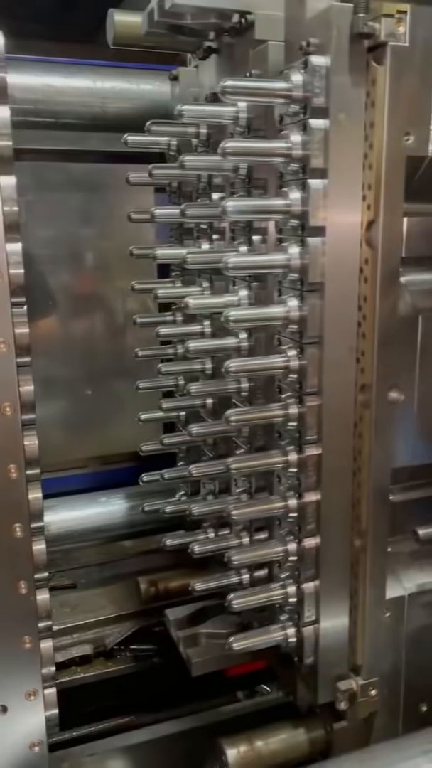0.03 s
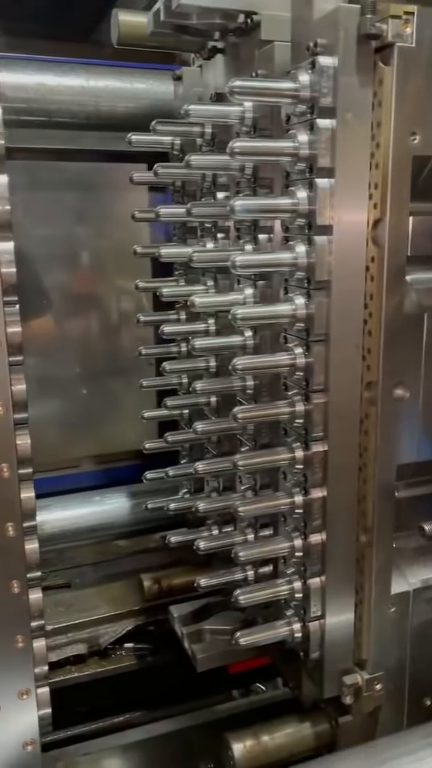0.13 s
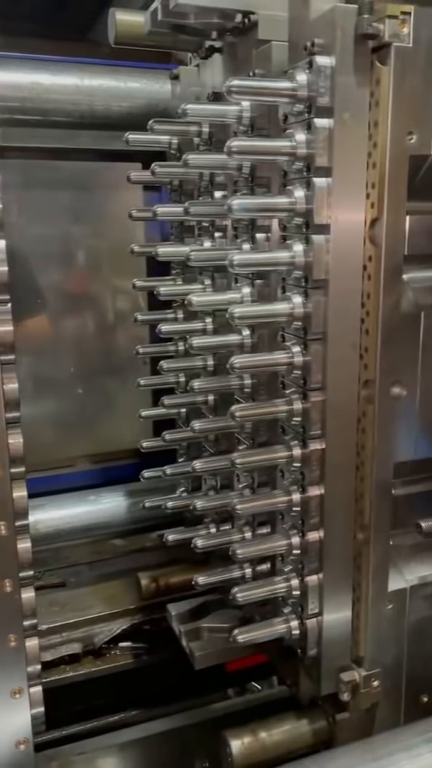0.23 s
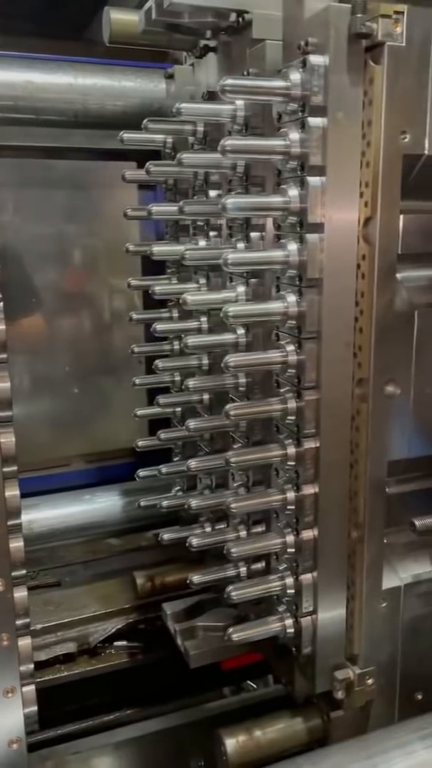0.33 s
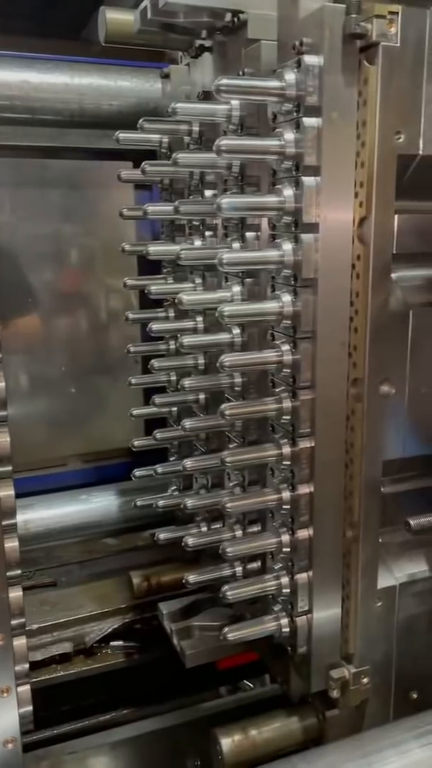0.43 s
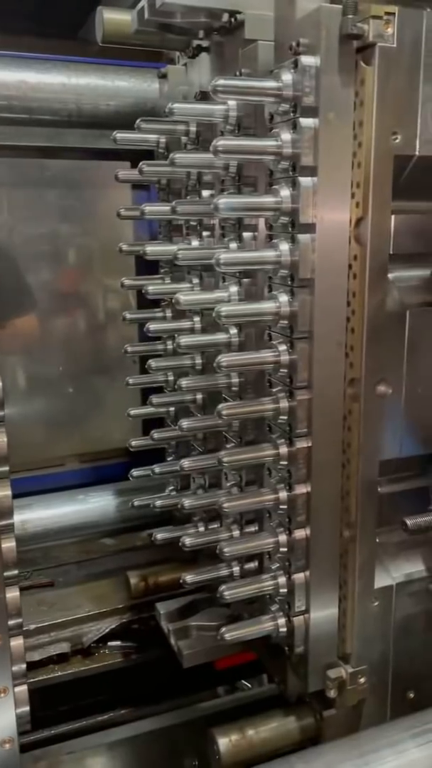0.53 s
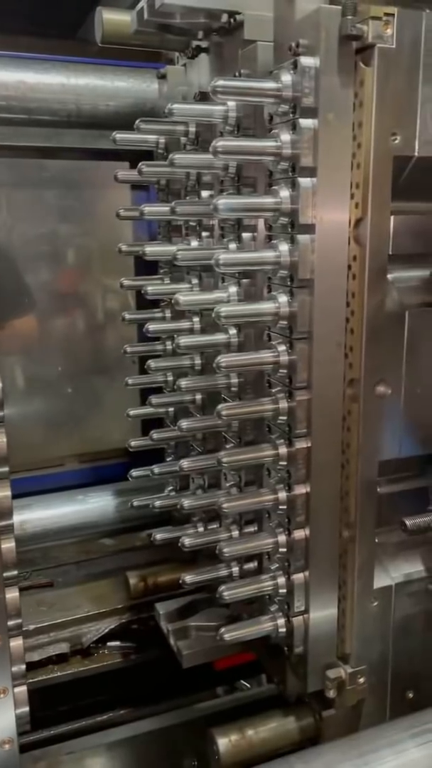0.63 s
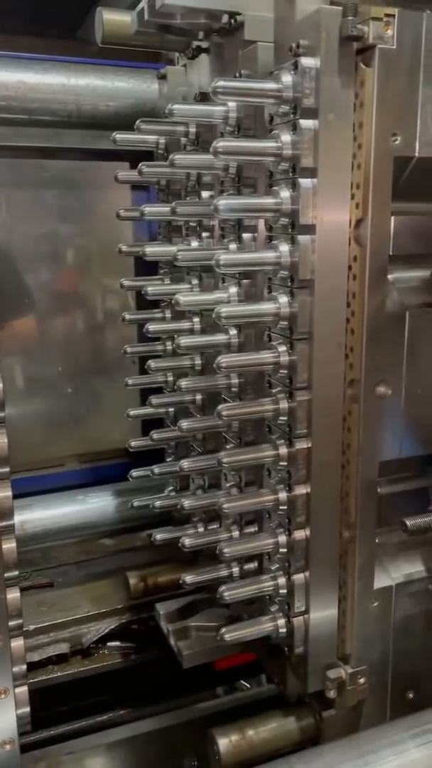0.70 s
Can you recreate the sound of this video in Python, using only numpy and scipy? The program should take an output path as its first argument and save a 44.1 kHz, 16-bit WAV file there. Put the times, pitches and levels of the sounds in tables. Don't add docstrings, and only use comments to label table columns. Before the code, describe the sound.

An injection moulding machine about a metre away rumbles and hums with scraping slides and thin hiss. At 0.7 s a knock, short air spurt and squeaks come; from 1.2 to 1.7 s metal plates clatter densely. The drive sinks, a sharp clack lands at 2.25 s, and at 2.5 s air bursts out, hissing and gradually dulling to 4 s, with a faint tick near 3.9. Short factory reverberation, thinned phone treble.

```python
import sys
import numpy as np
from scipy import signal
from scipy.fft import rfft, irfft
from scipy.io import wavfile
from scipy.ndimage import uniform_filter1d

SR = 44100
rng = np.random.default_rng(int(sys.argv[2]) if len(sys.argv) > 2 else 0)


def log_audio(samples):
    frames = np.atleast_2d(samples).T
    limited = np.clip(frames, -1, 1)
    pcm = np.round(limited * 32767).astype(np.int16)
    wavfile.write(sys.argv[1], SR, pcm)


def rack_gain(trim_db):
    fader = np.asarray(trim_db, float)
    return 10 ** (fader / 20)


N = 176400
T = np.arange(N) / SR
HZ = np.maximum(np.arange(N // 2 + 1) * SR / N, 1)


def over_hz(table):
    hz, value = np.array(table).T
    return np.interp(np.log(HZ), np.log(hz), value)


def over_time(table):
    seconds, db = np.array(table).T
    return rack_gain(np.interp(T, seconds, db))


def unit(x):
    return x / np.sqrt(np.mean(x ** 2))


def walk(rate):
    hold = int(SR / rate)
    steps = np.repeat(rng.standard_normal(N // hold + 1), hold)
    smooth = uniform_filter1d(uniform_filter1d(steps, hold), hold)
    return unit(smooth[:N])


def causal(x, db):
    cepstrum = irfft(np.log(rack_gain(db)), N)
    cepstrum[1:N // 2] *= 2
    cepstrum[N // 2 + 1:] = 0
    return irfft(rfft(x) * np.exp(rfft(cepstrum)), N)


def lively(colour, swell_db, flicker_db, rate):
    spectrum = rfft(rng.standard_normal(N)) * rack_gain(over_hz(colour))
    swell, out = walk(3.25), 0
    for octave in range(5, 15):
        part = np.clip(1 - np.abs(np.log2(HZ) - octave), 0, 1)
        out = out + irfft(spectrum * part, N) * rack_gain(swell_db * swell + flicker_db * walk(rate))
    return unit(out)


def gate(start, length, edge, tail):
    rise = np.clip((T - start) / edge, 0, 1)
    return rise * np.exp(-np.maximum(T - start - length, 0) / tail)


HALL_T60_S, HALL_DB, HALL_TOP_HZ = 0.36, -13, 3020


def hall(hits):
    echoes = rng.standard_normal(N) * rack_gain(-60 * T / HALL_T60_S)
    echoes = echoes / np.sqrt(np.sum(echoes ** 2))
    dull = 1 + 1j * HZ / HALL_TOP_HZ
    return rack_gain(HALL_DB) * irfft(rfft(hits) * rfft(echoes) / dull, N)


# [t/s, level/dB]
DRIVE_LOAD = [(.05, -23), (.6, -26.5), (.85, -27), (1.1, -32.5), (1.3, -28), (1.75, -36), (1.9, -38.5),
              (2.2, -30), (2.3, -37.5), (2.5, -32), (2.65, -42.5), (2.9, -39.5), (3.1, -44.5), (3.7, -43.5),
              (3.9, -43), (4, -44.5)]
# [f/Hz, level/dB]
RUMBLE_COLOUR = [(25, -40), (48, -0.5), (62, -7.5), (130, 1.5), (200, -2.5), (356, -1.5), (470, -28),
                 (1500, -28), (3000, -96)]
# [f/Hz, level/dB]
HUM_TONES = [(48.6, -46), (75.6, -35.5), (157, -38.5), (198.5, -31), (237, -34.5), (406, -42)]
HUM_ENDS_S, HUM_FADE_S, HUM_REST_DB, HUM_WOBBLE_DB = 1.2, .04, -10, 3.5


def drive():
    hum = np.zeros(N)
    for hz, db in HUM_TONES:
        level = rack_gain(db + HUM_WOBBLE_DB * walk(20))
        hum += level * np.sqrt(2) * np.sin(2 * np.pi * hz * T + 1.19 * walk(16))
    load = over_time(DRIVE_LOAD)
    ended = 1 / (1 + np.exp((HUM_ENDS_S - T) / HUM_FADE_S))
    rest = rack_gain(HUM_REST_DB) * load / load[SR]
    rumble = load * lively(RUMBLE_COLOUR, .5, 1.5, 16)
    return rumble + hum * (1 - ended + ended * rest)


# [t/s, level/dB]
SLIDE_LEVEL = [(.05, -34.5), (.6, -32.5), (.85, -37.5), (1.15, -30.5), (1.3, -34.5), (1.41, -31),
               (1.45, -27), (1.7, -28), (1.85, -32), (2.2, -34), (2.28, -44), (2.32, -44.5), (2.48, -36.5),
               (2.55, -40.5), (3, -43), (3.7, -45), (3.85, -43.5), (4, -49)]
# [f/Hz, level/dB]
SCRAPE_COLOUR = [(180, -33), (300, -4), (470, -8.5), (900, -8.5), (3000, -19), (7000, -27), (11800, -30.5)]


def slides():
    return over_time(SLIDE_LEVEL) * rack_gain(5.5) * lively(SCRAPE_COLOUR, .3, 1.5, 18)


# [t/s, level/dB]
LEAK_LEVEL = [
    (.05, -39.5),
    (.63, -37),
    (.7, -40),
    (.725, -12),
    (.76, -36.5),
    (1.0, -37.5),
    (1.3, -40),
    (1.8, -56),
    (2.3, -68),
]
# [f/Hz, level/dB]
HISS_COLOUR = [(2500, -30), (5000, -10), (8000, 0.5), (11800, -6.5)]


def leak():
    return over_time(LEAK_LEVEL) * lively(HISS_COLOUR, 0.91, 1.4, 22.5)


VENT_S, VENT_DB, VENT_ATTACK_S = 2.503, -20.5, 0.0014
PUFF_DB, PUFF_S = 5, .035
DRAIN_DB_PER_S, LATE_DRAIN_DB_PER_S, DARKEN_DB_PER_S = 4.5, 2, 5
VALVE_STEP_S, VALVE_STEP_DB = 2.85, -2.5
# [f/Hz, level/dB]
JET_COLOUR = [(240, -46), (550, -6), (900, 2), (2500, -1), (6700, -2.5), (9000, 3), (11800, -1)]
# [f/Hz, level/dB]
JET_WHISTLES = [(6915, -13.5), (8236, -19)]


def vent():
    t = np.maximum(T - VENT_S, 0)
    db = VENT_DB - DRAIN_DB_PER_S * t
    db += VALVE_STEP_DB * np.clip((T - VALVE_STEP_S) / 0.076, 0, 1)
    db -= LATE_DRAIN_DB_PER_S * np.maximum(T - VALVE_STEP_S, 0)
    jet = lively(JET_COLOUR, .3, 1.2, 30)
    for hz, whistle_db in JET_WHISTLES:
        level = rack_gain(whistle_db + 3.1 * walk(25.06))
        jet = jet + level * np.sin(2 * np.pi * hz * T + 2.7 * walk(60))

    def below(hz):
        return signal.sosfilt(signal.butter(2, hz, fs=SR, output="sos"), jet)

    puff = (rack_gain(PUFF_DB * np.exp(-t / PUFF_S)) - 1) * (jet - 0.7 * below(5300))
    lost_body = (1 - rack_gain(-DARKEN_DB_PER_S * t)) * below(4800)
    return np.clip(t / VENT_ATTACK_S, 0, 1) * rack_gain(db) * (jet + puff - lost_body)


# [t/s, length/s, level/dB, first f/Hz, last f/Hz]
GUIDE_SQUEAKS = [(.745, .04, -27, 1750, 1580), (.785, .045, -27, 1620, 1950), (.845, .075, -36, 5650, 5900),
                 (.82, .14, -35.5, 5380, 5550), (.86, .1, -33.5, 2750, 2780), (.865, .1, -34.5, 1920, 1980),
                 (.94, .025, -31, 1900, 2150), (.95, .012, -33, 5700, 5200), (.865, .05, -33, 1250, 1200),
                 (.79, .06, -34.5, 2900, 2700), (1.12, .2, -34, 930, 975), (3.77, .12, -41, 330, 350)]
SQUEAK_WIDTH_HZ, SQUEAK_EDGE_S, SQUEAK_FLUTTER_DB = 105, .012, 3.5


def squeaks():
    out, jitter, flutter = np.zeros(N), walk(1500), walk(120)
    for start, length, db, first_hz, last_hz in GUIDE_SQUEAKS:
        hz = np.interp(T, [start, start + length], [first_hz, last_hz]) + SQUEAK_WIDTH_HZ * jitter
        level = rack_gain(db + SQUEAK_FLUTTER_DB * flutter) * gate(start, length, SQUEAK_EDGE_S, SQUEAK_EDGE_S)
        out += level * np.sin(2 * np.pi * np.cumsum(hz) / SR)
    return out


# [t/s, peak level/dB, f/Hz, t60/s]
PART_KNOCKS = [(0.697, -9.5, 400, 0.036), (.698, -24, 205, .12), (.7, -23, 313, 0.1),
               (.712, -24, 595, 0.089), (.714, -26, 3750, 0.046), (0.741, -26, 3150, 0.17),
               (0.746, -26, 2340, 0.14), (1.03, -22, 2523, 0.15), (1.032, -36, 3700, 0.14),
               (1.175, -21, 3550, 0.039), (1.18, -12, 1248, 0.12), (1.18, -24.5, 3573, 0.18),
               (1.179, -17.5, 412, 0.22), (1.18, -14.5, 2310, 0.054), (1.21, -23, 2800, .06),
               (1.219, -19, 972, 0.25), (1.235, -27, 4820, 0.13), (1.265, -24.5, 3150, 0.063),
               (1.31, -28, 4940, 0.1), (1.339, -11.5, 970, 0.14), (1.338, -4, 2020, 0.038),
               (1.345, -18, 2110, 0.05), (1.345, -22, 3160, .08), (1.36, -16, 2220, 0.047),
               (1.362, -26, 4800, 0.033), (1.388, -22, 3860, 0.048), (1.426, -19, 436, 0.048),
               (1.433, -22, 3180, 0.091), (1.451, -17, 944, .06), (1.457, -18, 4880, 0.051),
               (1.462, -19, 418, 0.056), (1.472, -25.5, 130, 0.64), (1.489, -11.5, 3230, 0.054),
               (1.489, -13, 4900, 0.071), (1.514, -14, 1510, 0.13), (1.566, -14.5, 380, 0.07),
               (1.568, -18, 3180, .07), (1.593, -13.5, 400, 0.13), (1.595, -14, 1285, 0.073),
               (1.632, -15, 1276, 0.052), (1.655, -25, 400, 0.11), (2.258, -21, 532, 0.14),
               (2.505, -24, 1136, 0.14), (3.93, -31, 4900, 0.075), (3.93, -34, 5600, .05),
               (3.929, -38, 3360, .05)]
KNOCK_DETUNE, KNOCK_PAIR_DB, KNOCK_ROUGH = 1.05, -4, .75


def knocks():
    out, loose = np.zeros(N), KNOCK_ROUGH * walk(250)
    for start, db, hz, t60 in PART_KNOCKS:
        t = np.maximum(T - start, 0)
        pair = np.sin(2 * np.pi * hz * t) + rack_gain(KNOCK_PAIR_DB) * np.sin(2 * np.pi * hz * KNOCK_DETUNE * t)
        rough = 1 + loose * np.minimum(t / .006, 1)
        out += rack_gain(db - 60 * t / t60) * np.minimum(t / .0012, 1) * pair * rough
    return out


# [t/s, length/s, level/dB, brightness from -3 (dull) to 3 (bright), held beyond]
PLATE_CLATTER = [(0.644, 0.012, -27, -1), (0.654, 0.03, -24, -1.9), (0.692, 0.033, -17.5, -1),
                 (0.717, 0.025, -18.5, 3), (0.748, 0.035, -27, 1), (0.928, 0.058, -31, 0.5),
                 (1.029, 0.03, -27.5, 0), (1.174, 0.012, -13, -0.5), (1.196, 0.068, -20, -0.5),
                 (1.271, 0.079, -32.5, 5.5), (1.334, 0.048, -25.5, 5), (1.426, 0.032, -16, -1.5),
                 (1.454, 0.065, -14.5, -0.5), (1.505, 0.045, -19.5, -1), (1.558, 0.023, -15.5, -0.5),
                 (1.583, 0.03, -13, 0), (1.619, 0.056, -20, -0.5), (1.687, 0.095, -26.5, -2),
                 (1.808, 0.34, -31, -3), (.8, .12, -33.5, -1.5), (0.986, 0.076, -30, -2),
                 (1.664, 0.017, -28, -1), (2.225, 0.02, -26.5, -0.5), (2.244, 0.015, -13, -0.5),
                 (2.255, 0.01, -7.5, -0.7), (2.263, 0.0073, -40, -14), (2.275, 0.037, -31, -10),
                 (3.931, 0.0045, -40, 3)]
# [f/Hz, width/Hz, level/dB]
PLATE_TONES = [(400, 34, -4), (990, 440, -3), (1510, 140, 0.5), (1960, 260, 0.5), (3185, 340, 1),
               (3750, 250, 2), (4900, 630, -1.5), (6580, 120, -0.5)]
# [f/Hz, level/dB]
PLATE_BODY = [(60, -38), (120, -14), (380, -3.5), (2400, -6), (3200, -12), (4900, -14), (8500, -13),
              (11800, -26.5)]
CLICKS_PER_S, CLICK_SCATTER_DB = 3000, 2
CLATTER_RISE_S, CLATTER_TAIL_S, RATTLE_DB = .003, .008, 3.2


def clatter():
    clicks = (rng.random(N) < CLICKS_PER_S / SR) * rng.standard_normal(N)
    clicks = clicks * rack_gain(CLICK_SCATTER_DB * rng.exponential(size=N))
    clicks = unit(unit(clicks) + 1.45 * rng.standard_normal(N))
    ring = sum(rack_gain(2 * db) / (1 + (2 * (HZ - hz) / width) ** 2) for hz, width, db in PLATE_TONES)
    body = over_hz(PLATE_BODY) + 10 * np.log10(.25 + ring)
    body = body - 10 * np.log10(np.mean(rack_gain(2 * body)))
    octaves = np.log2(np.clip(HZ, 150, 12000) / 1200)
    dull = causal(clicks, body - 4.5 * octaves)
    bright = causal(clicks, body + 3 * octaves)
    out = np.zeros(N)
    for start, length, db, tilt in PLATE_CLATTER:
        share = np.clip(.5 + tilt / 6, 0, 1)
        blend = share * bright + (1 - share) * dull
        out += rack_gain(db) * gate(start, length, CLATTER_RISE_S, CLATTER_TAIL_S) * blend
    return out * rack_gain(RATTLE_DB * walk(110))


def reframed(x, size, change):
    hz, _, z = signal.stft(x, SR, "cosine", size, size // 2)
    return signal.istft(change(hz, z), SR, "cosine", size, size // 2)[1][..., :N]


# [f/Hz, level/dB]
LEFT_OVER_RIGHT = [(100, 0), (200, 1.5), (400, 4.5), (800, 3.5), (1200, 0.5), (12000, 0)]
# [f/Hz, phase/radians]
LEFT_LEAD = [(100, 0), (250, 0.32), (600, 0.6), (1200, 0.99), (2300, 0.017), (7000, 0.49)]
# [f/Hz, level/dB]
SCATTERED = [(60, -27), (200, -35), (500, -1.5), (1200, -19.5), (3000, -0.5), (8000, -3.5)]


def two_ports(near):
    scattered = reframed(near, size=512, change=lambda hz, z: z * np.exp(2j * np.pi * rng.random(z.shape)))
    mid, side = rfft(near), rfft(scattered) * rack_gain(over_hz(SCATTERED))
    apart = rack_gain(over_hz(LEFT_OVER_RIGHT) / 2) * np.exp(.5j * over_hz(LEFT_LEAD))
    return np.array([irfft(mid * apart + side, N), irfft(mid / apart - side, N)])


def scene():
    hits = clatter() + knocks() + squeaks()
    return two_ports(hits + hall(hits) + drive() + slides() + vent() + leak())


# [low f/Hz, high f/Hz, share of time silent, changes/per s, share of lines
THINNED_BANDS = [(800, 3000, 0, 20, .88), (3000, 5700, 0, 20, .7), (5700, 6400, .03, 25, .5),
                 (6400, 6750, .12, 20, .35), (6750, 7130, .05, 14, .22), (7130, 7600, .75, 18, .25),
                 (7600, 8300, .3, 30, .2), (8300, 8430, .85, 14, .4), (8430, 8750, .45, 18, .3),
                 (8750, 9700, .06, 20, .25), (9700, 10300, .8, 16, .25), (10300, 11000, .06, 14, .28),
                 (11000, 11700, .25, 12, .25), (11700, 22050, 1, 7, .1)]
TICK_LOW_HZ, TICK_HIGH_HZ, TICK_SHARE, TICK_DB = 7600, 8300, .5, -6


def thin_out(hz, z):
    frames = z.shape[-1]
    at, gain = np.arange(frames) * N // frames, np.ones(z.shape[1:])
    for low, high, silent, rate, kept in THINNED_BANDS:
        band, mood = (hz >= low) & (hz < high), walk(rate)[at]
        lines = (rng.random((band.sum(), frames)) < kept) / np.sqrt(kept)
        gain[band] = lines * (mood >= np.quantile(mood, silent))
    band = (hz >= TICK_LOW_HZ) & (hz < TICK_HIGH_HZ)
    size = np.sqrt(np.mean(np.abs(z[:, band]) ** 2, axis=1, keepdims=True)) * rack_gain(TICK_DB)
    tick = size * np.cos(np.pi * np.arange(len(hz)))[:, None] * rng.choice([-1, 1], frames)
    ticking = band[:, None] & (rng.random(frames) < TICK_SHARE)
    return np.where(ticking, tick, z * gain)


def low_pass(x):
    return signal.sosfilt(signal.butter(12, 12680, fs=SR, output="sos"), x)


START_S = 0.037


def record(dry):
    rounded = .85 * np.tanh(dry / .85)
    thinned = reframed(np.roll(rounded, 512, axis=1), size=2048, change=thin_out)
    thinned = np.roll(thinned, -512, axis=1)
    mix = thinned * np.clip((T - START_S) / 0.0015, 0, 1)
    return low_pass(mix)


dry = scene()
out = record(dry)
log_audio(out)
```